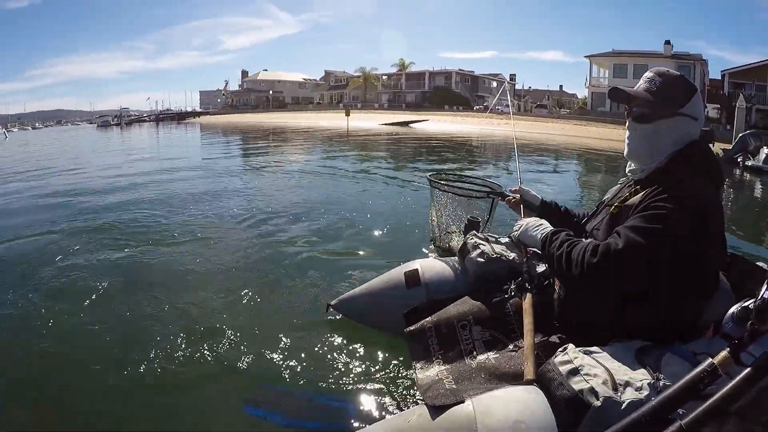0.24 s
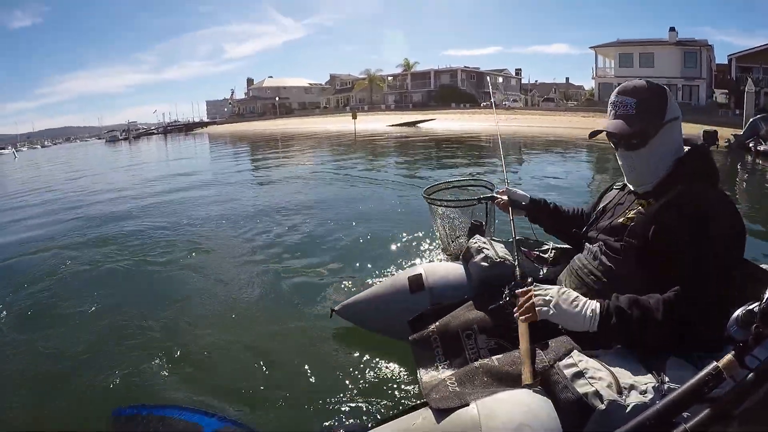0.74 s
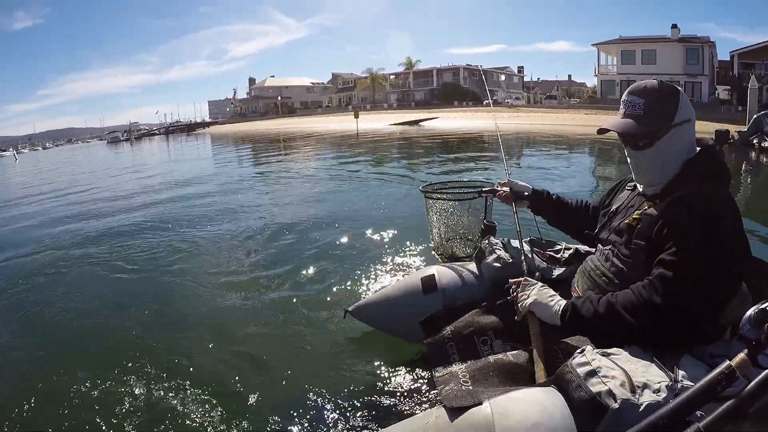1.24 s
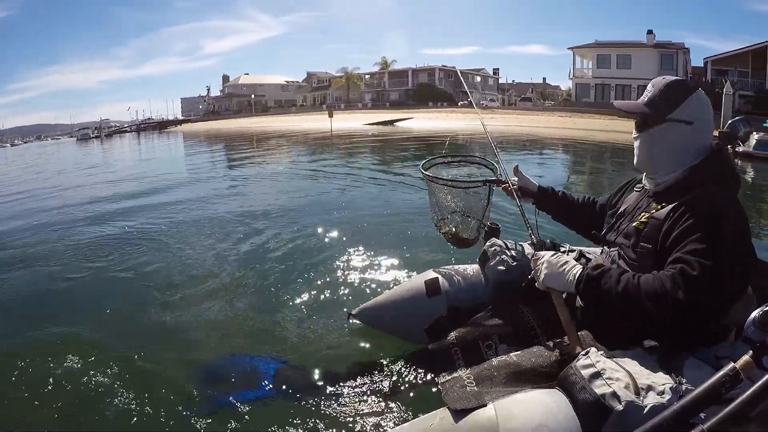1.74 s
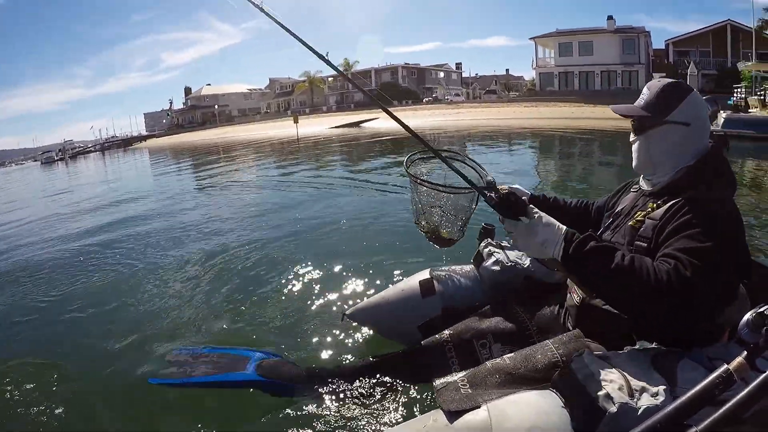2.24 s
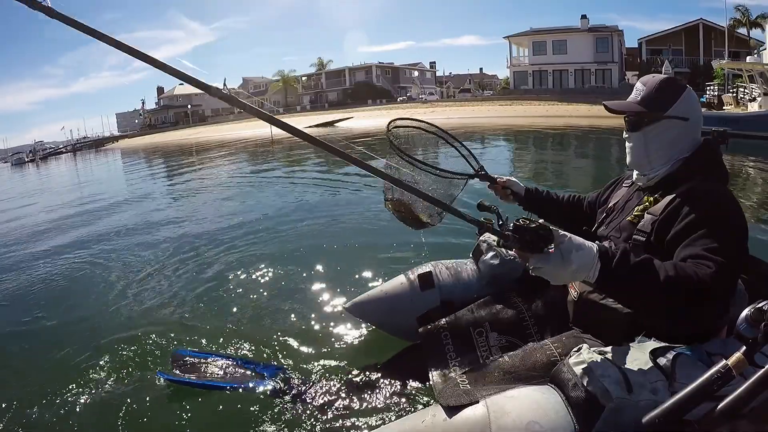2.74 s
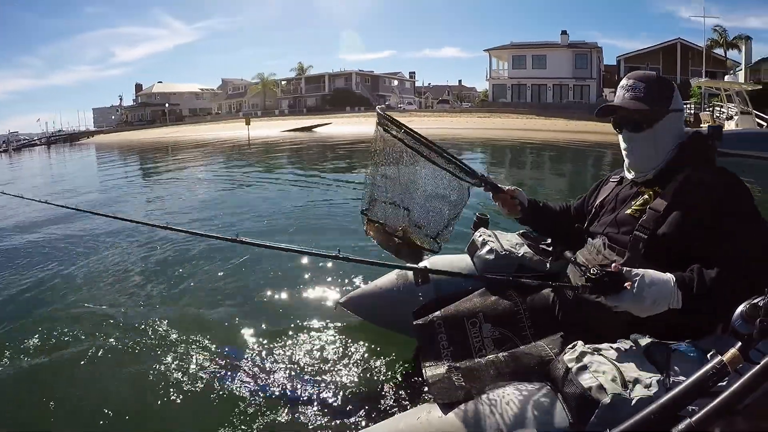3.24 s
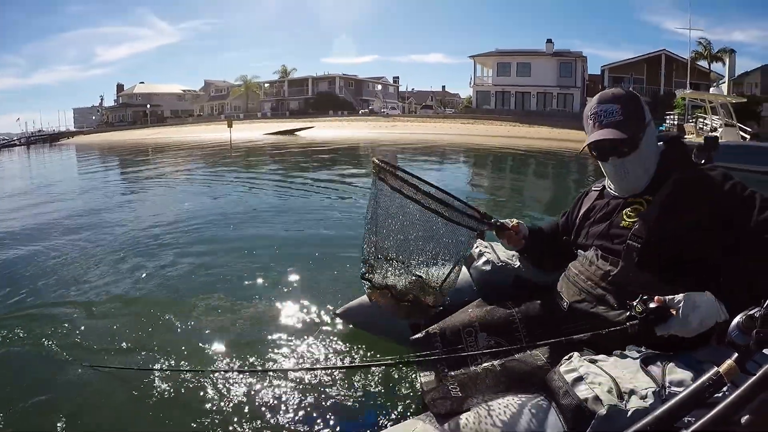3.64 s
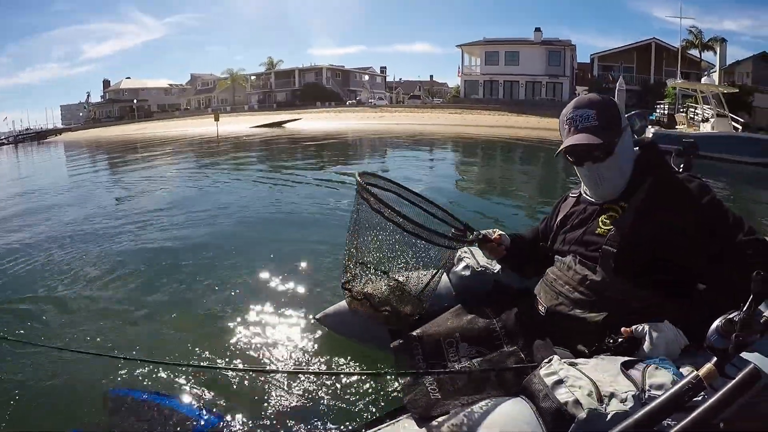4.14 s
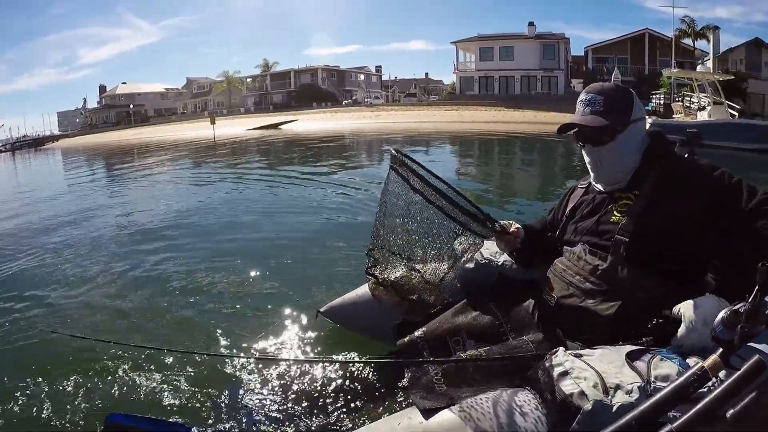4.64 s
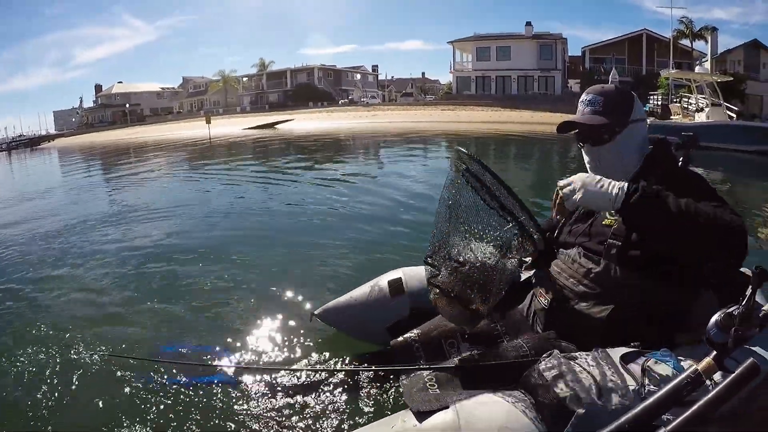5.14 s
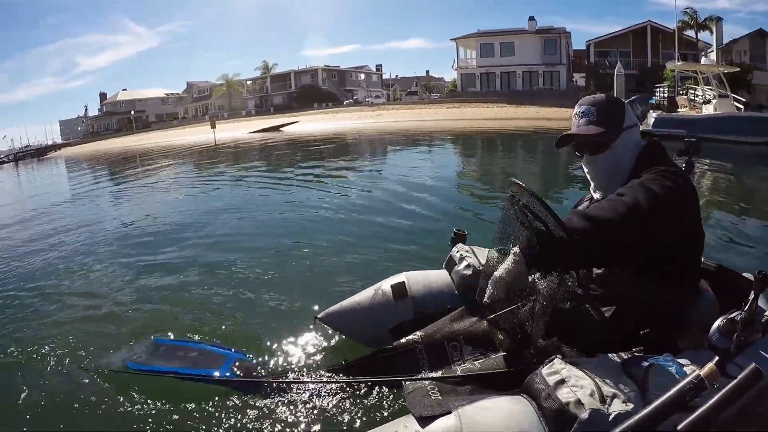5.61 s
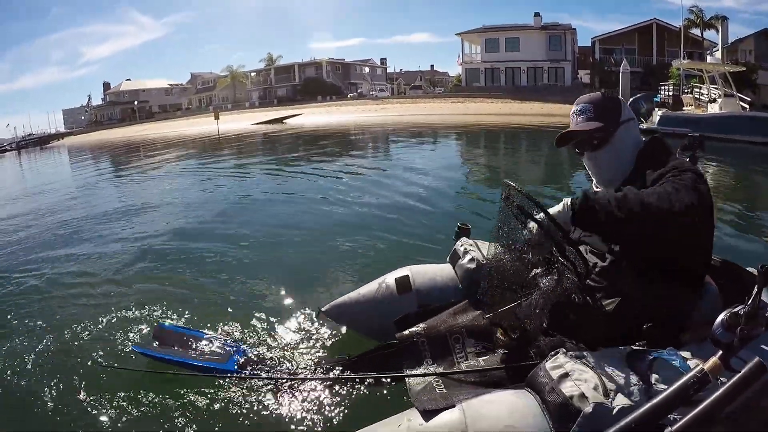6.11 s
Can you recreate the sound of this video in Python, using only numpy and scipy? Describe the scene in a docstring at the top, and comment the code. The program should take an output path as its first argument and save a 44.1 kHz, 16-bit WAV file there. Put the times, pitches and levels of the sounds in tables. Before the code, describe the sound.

Close water sloshes, fizzes and drips in bursts around a float tube, with soft thumps and wind rumbling on the microphone.

```python
"""Water stirred by a float-tube angler's fins and dripping net, close up in a calm harbour.
Each slosh is a swarm of ringing bubbles: gurgle, fizz and spray. Single bubbles glide, drips plink,
drops and gear snap, and gear thumps the inflated tube, ringing its air chamber and fabric.
Wind buffets the microphone over a low rumble, the harbour's hiss and a far drone."""
import sys
import numpy as np
from scipy import signal
from scipy.fft import rfft, irfft
from scipy.io import wavfile
from scipy.ndimage import uniform_filter1d

SR = 44100
rng = np.random.default_rng(int(sys.argv[2]) if len(sys.argv) > 2 else 0)


def wav_record(signal):
    """Record a signal, one row per channel, as 16-bit PCM in the file named by sys.argv[1]."""
    frames = np.transpose(np.atleast_2d(signal))
    bounded = np.clip(frames, -1, 1)
    # unit amplitude maps onto the largest positive 16-bit level
    quanta = np.round(bounded * 32767).astype(np.int16)
    wavfile.write(sys.argv[1], SR, quanta)


N = 280917


def gain_of(db):
    """Decibels to amplitude."""
    return 10 ** (np.asarray(db) / 20)


def unit_rms(x):
    """Scales to rms 1."""
    return x / np.sqrt(np.mean(x ** 2) + 1e-20)


def add(mix, start_s, sound):
    """Mixes a sound in at start_s."""
    part = mix[round(start_s * SR):][:len(sound)]
    part += sound[:len(part)]


def coloured_noise(samples, spectrum):
    """Noise at rms 1, shaped by rows of freq_hz, density_db."""
    hz, db = np.transpose(spectrum)
    shape_db = np.interp(np.log(np.fft.rfftfreq(samples, 1 / SR) + 0.29), np.log(hz + 0.03), db)
    return unit_rms(irfft(rfft(rng.standard_normal(samples)) * gain_of(shape_db), samples))


def wander(width_samples):
    """Twice-smoothed noise at rms 1."""
    smoothed = uniform_filter1d(rng.standard_normal(N), width_samples)
    return unit_rms(uniform_filter1d(smoothed, width_samples))


def bubble_ring(from_hz, to_hz, hold_s, rise=0.63, fall_db=30):
    """A bubble rings as a sine that glides as it nears the surface; it holds, then dies."""
    age = np.arange(0, 2 * hold_s, 1 / SR) / hold_s
    hz = from_hz * (to_hz / from_hz) ** np.minimum(age, 1.2)
    envelope = (1 - np.exp(-age / np.clip(rise, 0.01, 1))) * gain_of(-fall_db * (age / 2) ** 2)
    return envelope / envelope.max() * np.sin(2 * np.pi * np.cumsum(hz) / SR)


# strokes of fins and net: start_s, hold_s, gurgle_db, fizz_db, spray_db
SLOSHES = [(0, 0.18, -57.5, -65, -87), (0.408, 0.056, -59, -64, -71), (0.576, 0.26, -60, -73, -92),
           (.89, 0.2, -57, -53.5, -61.5), (1.09, 0.13, -50.5, -62.5, -72), (1.232, 0.13, -50, -52.5, -61.5),
           (1.463, 0.064, -55.5, -65, -75), (2.283, .11, -50.5, -49, -59.5),
           (2.437, .14, -56.5, -57, -65.5), (2.643, 0.14, -59.5, -57, -65), (2.785, .17, -57.5, -57, -70),
           (2.988, 0.053, -60, -63, -68), (3.391, 0.14, -61, -61, -70.5), (3.516, 0.046, -56, -55, -70),
           (3.585, 0.071, -54, -70.5, -77), (3.849, 0.028, -61, -59, -60.5), (3.917, .08, -62, -64, -69),
           (4.028, 0.35, -78, -68.5, -71), (4.258, 0.2, -54.5, -53.5, -60),
           (4.398, .13, -52.5, -54.5, -58.5), (4.575, 0.076, -52.5, -50.5, -62.5),
           (4.663, 0.088, -53, -54, -60), (4.82, 0.18, -67.5, -62, -69), (4.996, 0.21, -58.5, -69, -72.5),
           (5.526, 0.052, -58, -66, -60), (5.583, .17, -56.5, -60, -67.5), (5.802, 0.11, -62, -66, -69.5),
           (5.934, 0.072, -67, -63.5, -70), (6.074, 0.02, -65, -79, -66.5)]
# each for gurgle, fizz, spray
LAG_S, DECAY_DB_PER_S, LAPPING_DB = (0.012, 0.0033, 0.00056), (110, 152, 196), (-68.5, -78, -80)


def slosh_envelopes(rise_s=0.013):
    """Gurgle, fizz and spray swell over steady lapping; large bubbles come last and die slowest."""
    t, envelopes = np.arange(N) / SR, []
    for layer, (lag_s, decay, lapping_db) in enumerate(zip(LAG_S, DECAY_DB_PER_S, LAPPING_DB)):
        power = gain_of(lapping_db) ** 2
        for start_s, hold_s, *levels_db in SLOSHES:
            age_s = t - start_s - lag_s
            attack = np.clip(age_s / rise_s, 0, 1)
            level_db = levels_db[layer] - decay * np.maximum(age_s - hold_s, 0)
            power = power + (attack * gain_of(level_db)) ** 2
        envelopes.append(np.sqrt(power))
    return envelopes


# wash of tiny bubbles: freq_hz, density_db
WASH_SPECTRUM = [(180, -74), (300, 13), (354, 4.5), (411, 2), (892, 4), (1440, -4), (1640, -1.5),
                 (2360, -3.5), (5480, -25), (9460, -22.5), (15500, -51)]
# wash under gurgle, fizz, spray: low_hz, high_hz, gain_db
WASH_BANDS = [(330, 1400, -4.5), (1300, 5200, -5), (5200, 12500, -1.5)]
# bubble swarms: layer, low_hz, high_hz, rate_per_s, hold_cycles, spread_db, gain_db
SWARMS = [(0, 360, 1350, 350, 10, 4, -1), (1, 1000, 4600, 450, 9, 5, -1),
          (1, 1500, 6000, 150, 2.5, 4.5, -8), (2, 5000, 11500, 400, 9, 4.5, -5.5),
          (2, 4500, 10500, 90, 4, 4.5, -9), (3, 1300, 4800, 60, 5, 3.5, 0)]


def stirred_water(trickle_db=-67.5):
    """Random bubbles and droplet ticks over a wash of countless smaller ones, all in clumps."""
    clumps = gain_of(2.5 * wander(200))
    wash = rfft(coloured_noise(N, WASH_SPECTRUM))
    bins_hz, out = np.fft.rfftfreq(N, 1 / SR), np.zeros(N)
    envelopes = slosh_envelopes() + [gain_of(trickle_db)]  # layers: gurgle, fizz, spray, stray drips
    for layer, (low_hz, high_hz, gain_db) in enumerate(WASH_BANDS):
        band = 1 / np.sqrt((1 + (low_hz / (bins_hz + 1)) ** 8) * (1 + (bins_hz / high_hz) ** 8))
        out += envelopes[layer] * gain_of(gain_db) * unit_rms(irfft(wash * band, N) * clumps)
    for layer, low_hz, high_hz, rate_per_s, hold_cycles, spread_db, gain_db in SWARMS:
        swarm = np.zeros(N)
        onsets = np.flatnonzero(rng.random(N) < clumps * rate_per_s / SR)
        for onset, (pitch, glide, length, size) in zip(onsets, rng.random((len(onsets), 4))):
            hz = low_hz * (high_hz / low_hz) ** pitch
            size_db = spread_db * min(-np.log(size + 1e-9), 4)  # many small, few large
            ring = bubble_ring(hz, hz * (0.934 + 0.298 * glide), hold_cycles * (0.5 + length) / hz)
            add(swarm, onset / SR, gain_of(size_db) * ring)
        out += envelopes[layer] * gain_of(gain_db) * unit_rms(swarm)
    return out


# buffeting and rumble: freq_hz, density_db
BUFFET_SPECTRUM = [(.4, -68), (1.2, -39), (2, 19), (16, 15), (25, -6), (33, -12), (45, -19), (60, -48),
                   (100, -130)]
RUMBLE_SPECTRUM = [(24, -38), (40, -5), (54, -4.5), (97, -5.5), (180, -10), (340, -27), (440, -41.5),
                   (750, -120)]
# gusts: peak_s, level_db
GUSTS = [(0.058, -19), (.3, -28.5), (.66, -24.5), (1.05, -32), (1.55, -24), (1.86, -19), (2.34, -22),
         (2.71, -19), (3.08, -16.5), (3.421, -17), (3.78, -19.5), (4.029, -20.5), (4.269, -21.5),
         (4.751, -25), (5.13, -25), (5.639, -18), (5.84, -19), (6.14, -21)]


def wind(rise_db_per_s=117, fall_db_per_s=104, lull_db=-33, rumble_db=-42.5, wander_db=1.33):
    """Gusts press slow lumps on the microphone; a low rumble wanders in level."""
    buffet = coloured_noise(N, BUFFET_SPECTRUM)
    rumble = coloured_noise(N, RUMBLE_SPECTRUM)
    leveller = np.sqrt(uniform_filter1d(buffet ** 2, 9000) + 0.37)  # so the gusts set the strength
    t, gust_db = np.arange(N) / SR, lull_db
    for peak_s, level_db in GUSTS:
        below_peak_db = np.maximum(rise_db_per_s * (peak_s - t), fall_db_per_s * (t - peak_s))
        gust_db = np.maximum(gust_db, level_db - below_peak_db)
    return gain_of(gust_db) * buffet / leveller + gain_of(rumble_db + wander_db * wander(4000)) * rumble


# far drone: time_s, pitch_hz, level_db
DRONE = [(0, 76, -48), (.2, 72, -43.5), (.65, 76, -53.5), (.9, 76.3, -76), (1.55, 71.87, -46),
         (1.9, 74.16, -47.5), (2.3, 74.7, -45.5), (2.6, 74.1, -74), (6.37, 69.8, -69)]
# harbour hiss: freq_hz, density_db
HISS_SPECTRUM = [(200, -30), (310, 0), (500, -3), (1000, -13), (2000, -19), (2800, -23), (4200, -20),
                 (5200, -26), (6300, -28), (10000, -29), (12500, -33), (15500, -37)]


def harbour(hiss_db=-59):
    """Even hiss of far water and town, and a wavering drone as of a boat engine."""
    t = np.arange(N) / SR
    time_s, pitch_hz, level_db = np.transpose(DRONE)
    phase = 2 * np.pi * np.cumsum(np.interp(t, time_s, pitch_hz)) / SR
    drone = np.sqrt(2) * gain_of(np.interp(t, time_s, level_db)) * np.sin(phase)
    return gain_of(hiss_db) * coloured_noise(N, HISS_SPECTRUM) + drone


# drips on the surface: start_s, level_db, pitch_hz
DRIPS = [(.023, -39, 1510), (.174, -45.5, 2100), (0.217, -40.5, 1160), (.33, -44, 2850), (.483, -47, 3800),
         (.899, -41, 2570), (0.913, -41, 3040), (1.008, -35, 1980), (1.052, -32, 1410), (1.191, -42, 2310),
         (1.191, -28, 3240), (1.296, -35.5, 3750), (1.329, -33.5, 3470), (1.394, -40.5, 4050),
         (1.469, -32, 3270), (1.504, -35, 1600), (1.504, -33.5, 4270), (1.525, -43, 2030),
         (1.767, -49, 3800), (1.857, -46, 2120), (1.884, -41, 2100), (1.993, -49.5, 1490),
         (2.063, -47, 1870), (2.294, -29, 1530), (2.37, -33, 1380), (2.436, -39.5, 1540),
         (2.436, -38, 2880), (2.492, -32.5, 2410), (2.554, -36.5, 3800), (2.563, -35, 1640),
         (2.584, -32, 1900), (2.628, -33.5, 2950), (2.799, -39.5, 5200), (2.958, -35.5, 1610),
         (2.987, -35.5, 1880), (3.005, -37.5, 890), (3.022, -42, 2500), (3.263, -45, 1400),
         (3.262, -45.5, 3520), (3.384, -41.5, 2020), (3.42, -39, 500), (3.483, -40, 764),
         (3.522, -42.5, 4200), (3.536, -40.5, 3120), (3.553, -42, 3200), (3.562, -41.5, 3900),
         (4.077, -47.5, 1420), (4.236, -38, 3970), (4.273, -35, 3080), (4.322, -38, 3550),
         (4.354, -36, 3340), (4.37, -38, 3000), (4.433, -25.5, 2400), (4.484, -37.5, 2500),
         (4.61, -28.5, 3400), (4.612, -27.5, 2000), (4.633, -36, 3240), (4.641, -35, 1950),
         (4.667, -29.5, 3270), (4.709, -25.5, 2670), (4.733, -37, 3140), (4.749, -37, 1770),
         (4.909, -39.5, 3030), (4.985, -38.5, 2360), (4.996, -40, 4080), (5.017, -40.5, 2390),
         (5.048, -42.5, 2300), (5.165, -34.5, 366), (5.266, -44, 1940), (5.579, -40, 1650),
         (5.603, -47, 5200), (5.619, -44, 4540), (5.77, -45, 1600), (5.835, -45, 2850), (5.986, -47, 1920),
         (5.679, -45, 3270), (5.697, -40, 2660), (5.719, -41.5, 3860), (6.034, -47.5, 2970)]
# single bubbles: start_s, level_db, from_hz, to_hz, base_hold_ms
BUBBLES = [(0.067, -44.5, 1280, 1290, 5), (0.662, -45, 914, 936, 19), (.914, -48, 592, 586, 23),
           (0.916, -41.5, 1960, 1940, 4.5), (.972, -42, 2070, 1880, 11), (.993, -46, 725, 670, 31),
           (1.05, -40, 1060, 836, 15), (1.093, -42, 640, 630, 11), (1.116, -40.5, 1430, 1390, 13),
           (1.132, -41, 710, 590, 22), (1.139, -38, 960, 1160, 21), (1.281, -39, 960, 960, 7.6),
           (1.294, -47, 640, 596, 16), (1.311, -38.5, 1283, 1280, 4.4), (1.337, -42.5, 1120, 1150, 8.9),
           (1.368, -44.5, 465, 465, 27), (1.314, -46, 747, 634, 21), (1.369, -44, 2710, 2740, 5.5),
           (1.787, -50.5, 1490, 1380, 8.4), (2.295, -38, 963, 1020, 19), (2.31, -36, 1540, 1586, 17),
           (2.314, -43, 631, 755, 19), (2.32, -42.5, 316, 340, 23), (2.326, -35, 1690, 2100, 4.7),
           (2.339, -40, 750, 980, 13), (2.348, -36, 1410, 1320, 8.8), (2.351, -34.5, 332, 500, 15.7),
           (2.437, -41.5, 420, 438, 14), (2.508, -32, 1070, 1070, 6.1), (2.75, -40.5, 1073, 1080, 7.8),
           (3.028, -46.5, 660, 1010, 33), (3.085, -43, 850, 854, 3.7), (3.13, -47, 1330, 1230, 8.5),
           (3.138, -34.5, 560, 1150, 21.5), (3.141, -45.5, 414, 385, 59), (3.545, -49.5, 1015, 683, 16),
           (3.61, -43, 707, 1710, 46), (3.666, -56, 1170, 1830, 21), (4.254, -45, 1560, 1500, 9.3),
           (4.345, -40.5, 1190, 1223, 13.5), (4.423, -36, 2110, 2090, 6.5), (4.434, -34, 1700, 1660, 4),
           (4.371, -48, 826, 914, 12), (4.411, -47, 1520, 1510, 7.7), (4.615, -40, 1510, 1550, 3.5),
           (4.686, -42, 715, 730, 4), (4.732, -45, 2380, 2380, 15), (4.449, -39, 1054, 1050, 16),
           (4.471, -44.5, 1040, 1165, 13), (4.701, -43.5, 833, 1495, 40), (4.703, -44, 383, 465, 40),
           (4.738, -42, 890, 885, 6.2), (4.832, -47, 458, 536, 33), (5.068, -44, 865, 840, 6.1),
           (5.171, -39.5, 843, 864, 4.2), (5.609, -44, 2080, 2040, 7.6), (5.58, -46.5, 830, 900, 11),
           (5.745, -46, 1110, 1170, 8.6), (6.029, -51, 1240, 1260, 5.7), (6.055, -50, 1070, 1040, 8.5),
           (5.699, -44, 1580, 1550, 7), (5.823, -45, 1230, 1180, 4.2), (5.897, -48, 1100, 1090, 6.3),
           (5.931, -42.5, 1490, 1400, 8.1), (6.235, -48.5, 1734, 1613, 17)]


def drips_and_bubbles(drip_base_ms=1.63, extra_cycles=0.72):
    """Drips plink and bubbles ring, each with a slight tremble; wide glides start more softly."""
    out = np.zeros(N)
    drips = [(start_s, level_db, hz, hz, drip_base_ms) for start_s, level_db, hz in DRIPS]
    for start_s, level_db, from_hz, to_hz, base_hold_ms in BUBBLES + drips:
        rise = 0.03 + 0.037 * abs(np.log(to_hz / from_hz))
        hold_s = base_hold_ms / 1000 + extra_cycles / from_hz
        ring = bubble_ring(from_hz, to_hz, hold_s, rise, fall_db=37)
        tremble_hz = rng.uniform(63, 190)
        tremble = np.sin(2 * np.pi * (tremble_hz * np.arange(len(ring)) / SR + rng.random()))
        add(out, start_s, gain_of(level_db) * ring * (1 + 0.21 * tremble))
    return out


def swish(start_s=0.7, hold_s=0.04, low_hz=1450, high_hz=2600, level_db=-61):
    """A soft, narrow hiss swells in briefly."""
    age = np.arange(0, 1.2, 1 / (hold_s * SR))
    hiss = coloured_noise(len(age), [(low_hz * 0.8, -30), (low_hz, 0), (high_hz, 0), (high_hz, -30)])
    envelope = np.minimum(age / 0.25, 1) * np.clip((1.2 - age) / 0.17, 0, 1)
    out = np.zeros(N)
    add(out, start_s, gain_of(level_db) * hiss * envelope)
    return out


# splat noise: freq_hz, density_db
SPLAT_SPECTRUM = [(600, -38), (1000, -2), (1900, 6.5), (3300, 1.5), (4800, -4), (8000, -3), (11000, -11.5),
                  (15500, -2)]
# splats and snaps: start_s, strength_db, body_vs_treble_db, top_vs_treble_db
SPLATS = [(0.7792, -34, -7.5, -20), (1.044, -36, 4, -27), (1.073, -30, -13, -29), (1.1902, -54, -8, -27),
          (1.2121, -35, -28, -14), (1.2772, -28.5, -4, -20), (1.4412, -33.5, -2, -22),
          (1.5025, -24, -7.5, -19), (2.294, -34, 3, -23), (2.382, -32, -14, -31), (2.6265, -35.5, 1, -32),
          (2.7353, -32.5, -9, -23), (2.8076, -34.5, -1, -18), (2.832, -35, -29, -28),
          (2.8904, -36, -15, -23), (3.005, -39, 1, -30), (3.262, -41.5, 3, -28.5), (3.483, -50, -1, -30),
          (3.8237, -36.5, -6, -28), (3.9913, -31, -6, -15), (4.0048, -17.5, -3.5, -6),
          (4.2652, -35, -5, -19), (4.283, -32, -10, -27), (4.303, -35, -8, -33), (4.3445, -34, -19, -26),
          (4.408, -37, 3, -27), (4.535, -39, -5, -27), (4.6668, -33, -8, -25), (4.7368, -35, 5, -22),
          (4.796, -34.5, -12, -22), (5.1414, -37, -6, -26), (5.5382, -33.5, -20, -21),
          (5.6331, -35, -20, -28), (5.677, -34, -7, -24), (5.7104, -41.5, 8, -19), (5.851, -39.5, 2, -25),
          (5.93, -40, 5, -25), (6.09, -34.5, -17, -24)]


def splats(body_hz=5200, top_hz=11000, base_t60_s=0.0094, stretch_per_db=0.0844):
    """Drops and gear snap in short, lumpy noise bursts; louder ones last longer."""
    samples = 2048
    out, t, hz = np.zeros(N), np.arange(samples) / SR, np.fft.rfftfreq(samples, 1 / SR)
    body = 1 / (1 + (hz / body_hz) ** 8)
    top = 1 / (1 + (top_hz / (hz + 1)) ** 12)
    for start_s, strength_db, body_db, top_db in SPLATS:
        t60_s = max(base_t60_s * (1 + stretch_per_db * (strength_db + 34)), 0.003)
        envelope = gain_of(-60 * (t / t60_s) ** 1.74) * (1 - np.exp(-t / 0.00027))
        lumps = gain_of(3 * unit_rms(uniform_filter1d(rng.standard_normal(samples), 24)))
        lumps *= np.linalg.norm(envelope) / np.linalg.norm(envelope * lumps)
        balance = 1 - body - top + body * gain_of(body_db) + top * gain_of(top_db)
        burst = irfft(rfft(coloured_noise(samples, SPLAT_SPECTRUM)) * balance)
        add(out, start_s, gain_of(strength_db - 6) * burst * envelope * lumps)
    return out


def struck_modes(modes, t):
    """Decaying sines, detuned anew at each blow."""
    return sum(gain_of(level_db - 60 * t / t60_s) * np.sin(2 * np.pi * hz * rng.uniform(0.9, 1.01) * t)
               for hz, level_db, t60_s in modes)


# air chamber and stretched fabric: nominal_hz, level_db, t60_s
AIR_MODES = [(95.8, -12.5, 0.59), (136, -47, 0.076), (170, 4.5, 0.1), (203.2, -6, 0.2), (231, -21, 0.07)]
FABRIC_MODES = [(356, 2, 0.062), (561, -4, 0.089), (661, -9, 0.061), (980, -13.5, 0.052)]
# blows on the tube: start_s, strength_db, slap_db
THUMPS = [(0.784, -29, -20.5), (1.834, -40.5, -25), (2.647, -34, -18), (3.823, -31.5, -21.5),
          (5.292, -33, -25.5), (5.544, -42.5, -19), (5.598, -38, -30), (5.67, -39, -45),
          (5.857, -30.5, -21.5), (5.989, -38, -26.5), (6.186, -36, -36), (6.358, -33, -21.5)]


def tube_thumps(air_rise_s=0.0047):
    """A soft blow of gear rings the tube's air chamber and the fabric over it."""
    out, t = np.zeros(N), np.arange(SR // 4) / SR
    for start_s, strength_db, slap_db in THUMPS:
        air = struck_modes(AIR_MODES, t) * (1 - np.exp(-(t / air_rise_s) ** 2))
        fabric = gain_of(slap_db + 7.5) * struck_modes(FABRIC_MODES, t)
        add(out, start_s, gain_of(strength_db + 6.5) * (air + fabric))
    return out


def reflections(sound, t60_s=0.025, cutoff_hz=6000):
    """Tube, angler and water surface throw back a short, duller scatter of echoes."""
    t = np.arange(SR // 16) / SR
    taps = rng.standard_normal(len(t)) * (rng.random(len(t)) < 0.05)
    taps *= gain_of(-60 * t / t60_s) * (t > 0.001)
    response = signal.lfilter(*signal.butter(2, cutoff_hz, fs=SR), taps / np.linalg.norm(taps))
    return signal.oaconvolve(sound, response)[:N]


def scene():
    """All sources at one microphone."""
    near = drips_and_bubbles() + splats()
    echoes = gain_of(-8) * reflections(near)
    return (near + echoes + stirred_water() + swish() + tube_thumps() + wind() + harbour())[None]


def record(dry):
    """The band limit of a small camera."""
    lowpass = signal.firwin(511, cutoff=15700, window=("kaiser", 9), fs=SR)
    padded = np.pad(dry, ((0, 0), (255, 255)), "reflect")
    return signal.oaconvolve(padded, lowpass[None], "valid")


dry = scene()
out = record(dry)
wav_record(out)
```